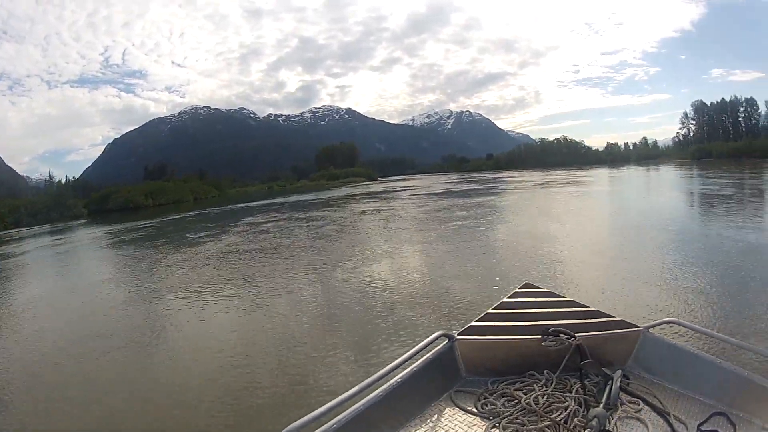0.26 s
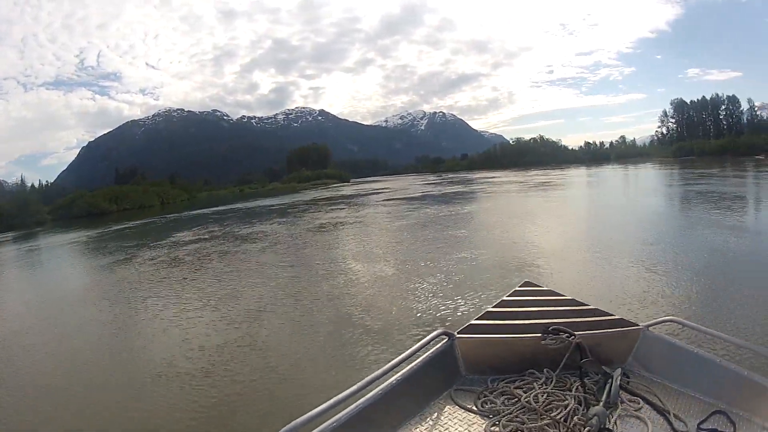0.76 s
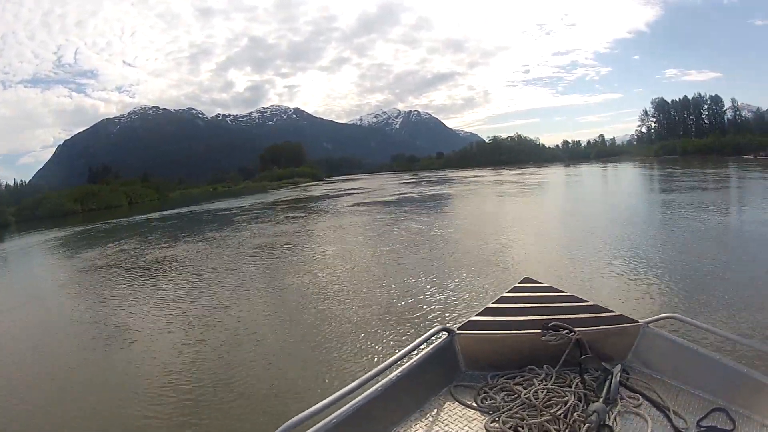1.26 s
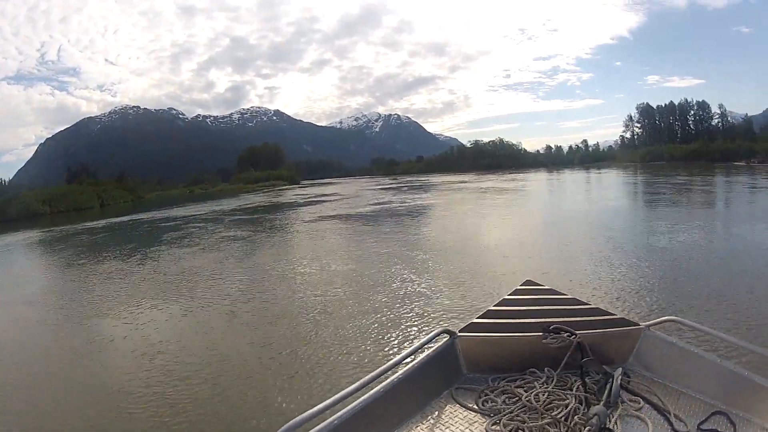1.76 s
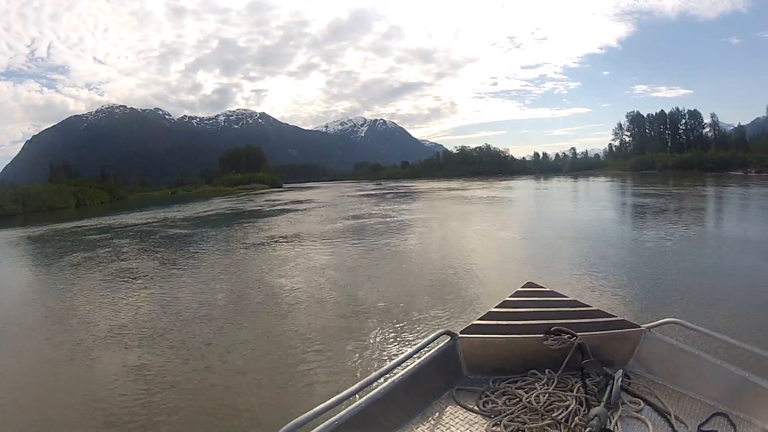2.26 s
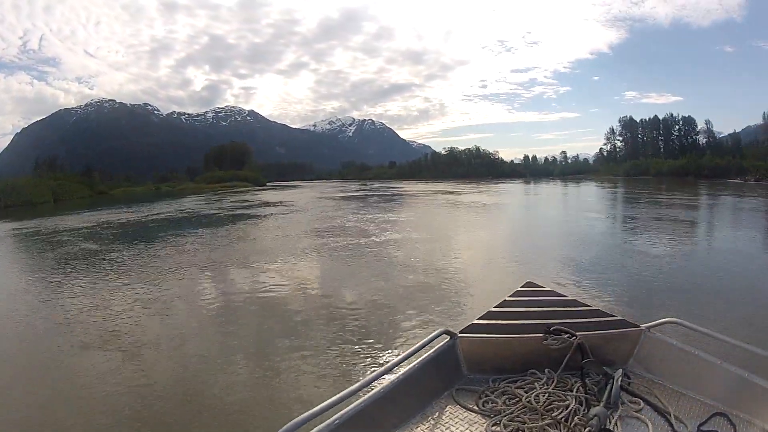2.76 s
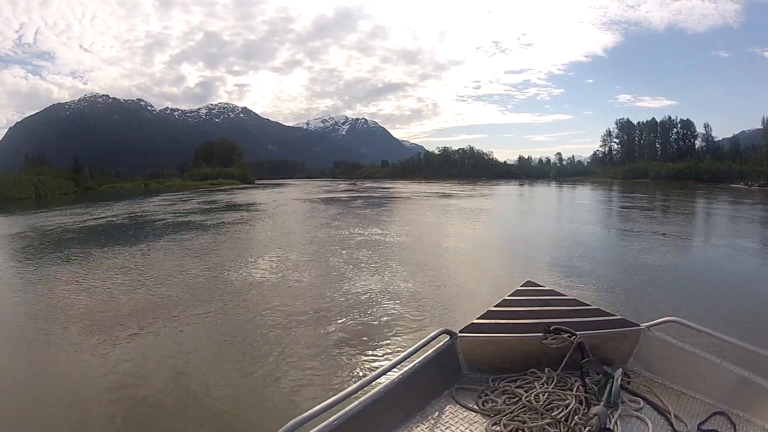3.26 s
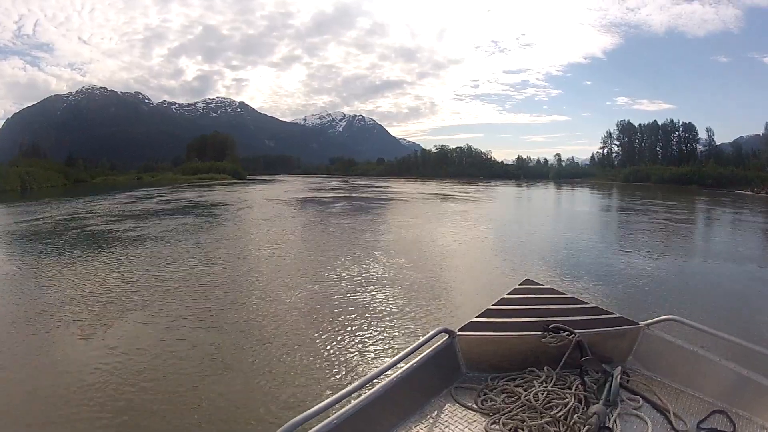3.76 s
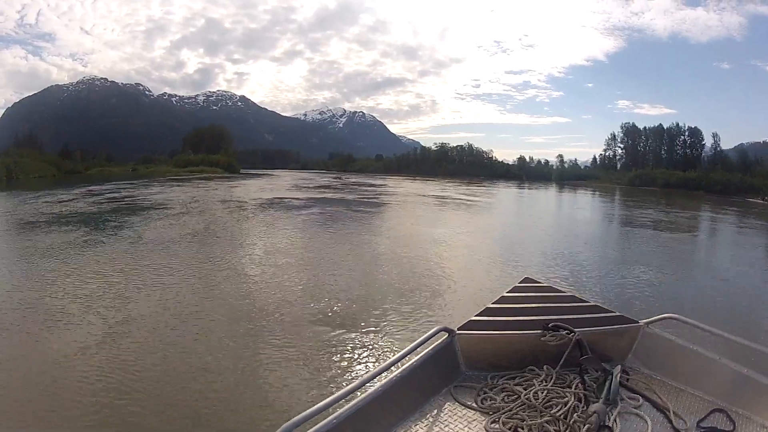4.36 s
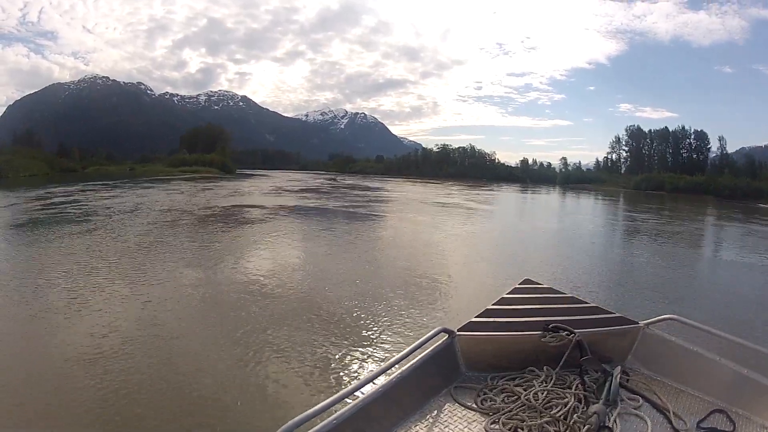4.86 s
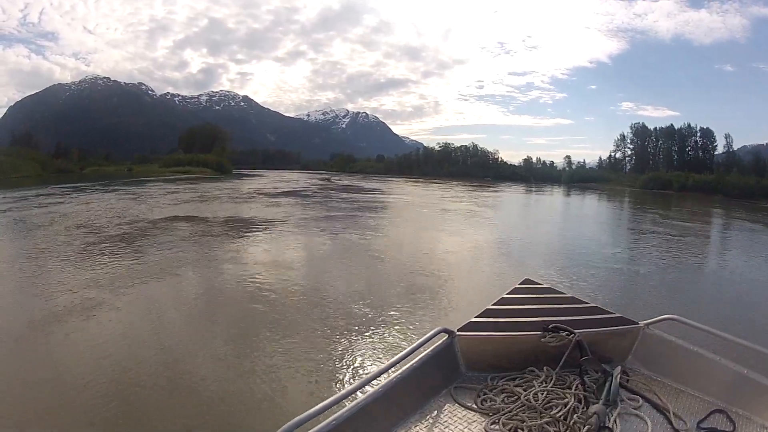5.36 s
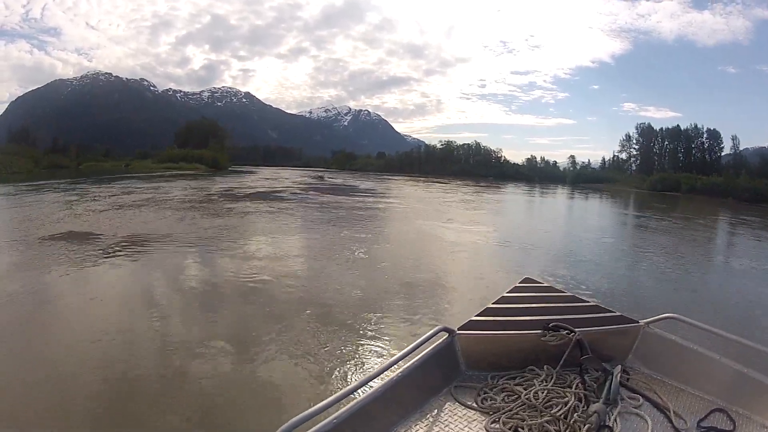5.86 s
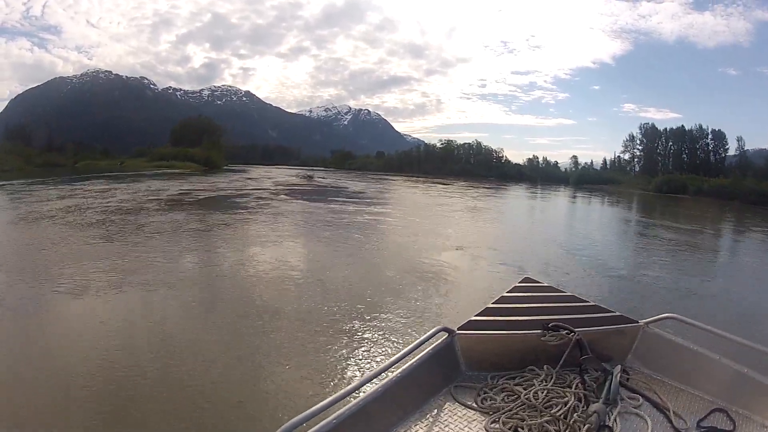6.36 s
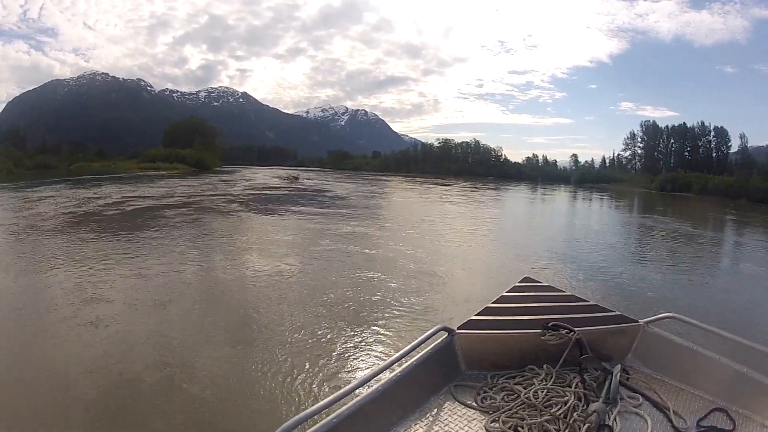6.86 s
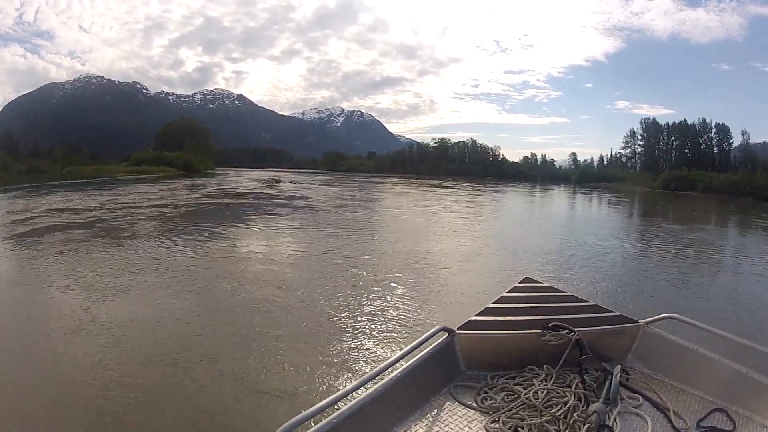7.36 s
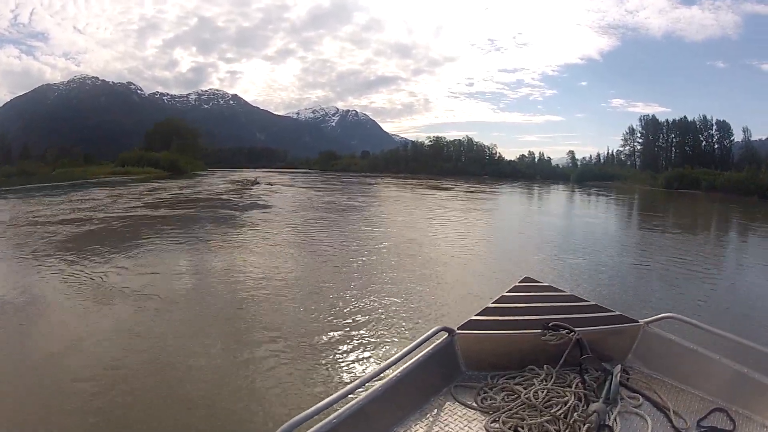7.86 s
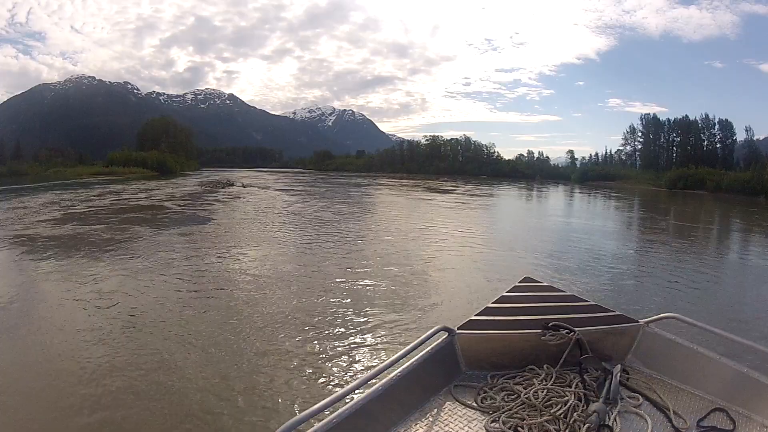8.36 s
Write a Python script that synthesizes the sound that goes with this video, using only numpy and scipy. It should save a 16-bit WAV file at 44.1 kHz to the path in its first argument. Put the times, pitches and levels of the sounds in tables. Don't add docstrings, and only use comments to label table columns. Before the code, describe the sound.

Aboard an open metal boat cruising a wide river, a low, slightly rough engine drone stays at constant speed, its throb swelling and thinning. Bright spray and wash hiss along the hull, fluttering as the bow lifts and lands. Small slaps tick by, a heavy bump lands near 1.8 seconds, and wind rumbles. The close microphone in a small closed case sounds boxy, with gritty treble.

```python
import sys
import numpy as np
from scipy import signal
from scipy.fft import rfft, irfft, next_fast_len
from scipy.io import wavfile
from scipy.ndimage import uniform_filter1d

SR = 44100
rng = np.random.default_rng(int(sys.argv[2]) if len(sys.argv) > 2 else 0)


def generate_wav(sig):
    pcm = np.round(np.clip(np.atleast_2d(sig).T, -1, 1) * 32767).astype(np.int16)
    wavfile.write(sys.argv[1], SR, pcm)


def linear_from_db(decibels):
    return 10 ** (np.asarray(decibels, float) / 20)


N = 380583
TIME = np.arange(N) / SR

# start_s, cycles_per_s
ENGINE_SPEED = [(0.0, 34.876), (0.78, 34.865), (1.56, 34.816), (2.34, 34.852), (3.12, 34.791),
                (3.9, 34.982), (4.68, 34.917), (5.46, 34.996), (6.24, 34.966), (7.02, 34.976), (7.8, 34.93),
                (8.58, 34.972)]
# multiple, level_db
STEADY_MULTIPLES = [(2, -56.5), (5, -30.5), (13, -79), (14, -71), (26, -63), (40, -63)]
WAVER_SHARE = [.25, .95, .2, .12, .14, .15, .1, .12, .3, .2, .25, .25, .5]
# start_s, shaft_throb_db, firing_bark_db
MOUNT_SWAY = [(0.0, -23, -33), (0.25, -24.5, -34), (0.8, -30, -33), (1.0, -38, -32.5), (1.65, -37, -31.5),
              (2.0, -29, -38.5), (2.3, -24, -39.5), (2.65, -29.5, -33), (3.4, -28, -39), (4.1, -26, -34),
              (4.4, -30.5, -34), (4.85, -23.5, -30.5), (5.4, -24, -32), (5.75, -42.5, -36.5),
              (7.15, -33, -38), (7.5, -22.5, -40), (7.9, -35, -33), (8.63, -35.5, -33)]
# multiple, before_db, after_db
HULL_PANELS = [(1, -52, -40), (3, -27.5, -34.5), (6, -36.5, -32.5), (7, -33, -32.5), (9, -48, -53),
               (10, -50, -49), (11, -53.5, -50.5), (12, -54.5, -49.5), (17, -57.5, -60), (18, -56, -60.5)]
# centre_s, multiple, change_db, length_s
PANEL_FLEX = [(0.4, 18, 6, .5), (1.448, 7, -10, 0.36), (1.55, 10, 8, .45), (3.0, 12, -9, 0.69),
              (2.25, 5, 4, .3), (2.5, 10, 9, 0.38), (2.6, 7, -8, 0.23), (3.002, 6, 6, 1.77),
              (2.8, 11, -6.5, 1.6), (3.4, 3, -9.5, .5), (3.497, 10, 11.5, 0.26), (3.7, 5, 2, .7),
              (3.9, 18, -9, 1.2), (4.0, 12, 2, 1), (4.036, 7, 6, 0.32), (4.6, 7, -11, 0.22),
              (4.9, 18, 10, 0.49), (5.0, 7, 4.5, 0.21), (5.25, 1, 7, .25), (5.55, 7, -3.5, .4),
              (6.2, 5, -2.5, .5), (6.6, 6, -9, 0.32), (6.69, 7, 3, 0.45), (7.2, 3, 4, .5),
              (7.2, 12, -3, .4), (8.2, 18, 8, 1.2), (8.2, 17, 9, 1.3), (8.295, 7, 5.5, 0.3),
              (8.4, 6, -10, .6), (0.95, 6, -11, .25)]
# freq_hz, level_db_per_hz
BOOM_SPECTRUM = [(60, -24), (82, -6), (97, 5.5), (116, -9), (150, -9), (200, -10), (236, 1), (262, -8),
                 (300, -16), (420, -23), (700, -36)]
# start_s, spray_db, wash_db
WATER_FLOW = [(0.0, -51, -41.5), (0.25, -52.5, -45.5), (0.6, -47.5, -43), (1.0, -43, -45),
              (1.45, -44, -48.5), (1.56, -41.5, -46), (2.3, -40.5, -45), (2.9, -44, -45.5),
              (4.55, -44, -42), (5.45, -50, -43), (5.7, -41.5, -44.5), (6.3, -40.5, -45.5),
              (7.2, -36.5, -45), (7.66, -45, -45.5), (7.83, -38.5, -45), (8.1, -40, -48.5),
              (8.3, -50.5, -49), (8.63, -42.5, -47)]
# landing_s, lull_db, lull_length_s, surge_db
BOW_BOUNCES = [(0.33, 0.5, .1, 7), (0.91, -4, 0.045, 1), (1.096, -9, 0.1, 10.5), (1.2, -3, 0.043, 2),
               (1.513, -2.5, 0.12, 2), (1.869, -4, 0.079, 1.5), (2.17, -2, 0.074, 5.5),
               (2.802, -3, 0.026, 4), (3.031, -11, 0.047, -0.5), (3.45, -4, 0.13, 5.5),
               (3.69, -5, 0.068, 0), (3.865, -4, .05, 0), (4.394, -7, 0.043, 2), (4.7, -4, 0.06, -1.5),
               (5.218, 4, 0.05, 6), (5.886, -7.5, 0.077, -1.5), (5.97, -2, .04, 2.5), (6.113, -3, 0.071, 4),
               (6.2, -1, 0.024, -2.5), (6.508, -2, 0.13, 3), (6.675, -2, 0.055, 4), (7.007, -4.5, .06, 1.5),
               (7.338, -6, .05, -2), (7.7, -1.5, 0.044, 1), (8.28, -5, 0.055, 3), (8.327, -1, 0.034, 6.5),
               (8.462, -1.5, .06, 7.5)]
# freq_hz, level_db_per_hz
WASH_SPECTRUM = [(380, -23), (500, -11.5), (620, -3), (730, -4), (930, -1.5), (1150, -7), (1600, -5.5),
                 (2100, -4), (2600, -9.5), (3100, -14.5), (3700, -13)]
# freq_hz, level_db_per_hz
SPRAY_SPECTRUM = [(1200, -19), (1700, -10), (2100, -5), (2450, 0), (2750, 0), (3000, -6), (3350, -9.5),
                  (3600, -20.5), (4200, -23.5)]
# freq_hz, level_db_per_hz
MIST_SPECTRUM = [(3000, -40), (3500, -18), (4000, -2.5), (5100, -5), (5600, -11), (5850, -16), (6300, -16)]
# freq_hz, width_hz, peak_db
DRUMMED_PLATES = [(632, 50, 3), (923, 60, 2.5)]
# freq_hz, width_hz, peak_db
CASE_MODES = [(2197, 59, 3), (2614, 130, 0.5), (3217, 124, 9.5), (3780, 230, 5.5), (4460, 200, 0),
              (4640, 180, 2.5)]
# start_s, peak_db
BOW_SLAPS = [(1.098, -28), (1.2096, -30.5), (1.4516, -28.5), (2.173, -43.5), (3.9649, -31), (5.8791, -33),
             (6.2852, -26.5), (6.511, -30), (6.6683, -29), (6.844, -24), (7.275, -29.5), (7.9294, -40)]
# freq_hz, level_db_per_hz
SPLASH_SPECTRUM = [(500, 0), (1200, -13), (2500, 7), (3400, -6.5), (3900, -22.0), (5600, -25)]
# start_s, peak_db, pitch_hz
HULL_BUMPS = [
    (1.762, -8, 108),
    (4.599, -34, 108),
    (6.113, -17, 105),
]
# freq_hz, level_db_per_hz
WIND_SPECTRUM = [(8, -18), (20, -3), (45, -1), (80, 3), (110, -3.5), (250, -34)]
# centre_s, rise_db, length_s
WIND_GUSTS = [
    (1.0, 2, 0.33),
    (1.4, 5, .2),
    (2.05, 4, 0.4),
    (4.45, 5.5, .5),
    (5.3, 8.5, .25),
    (5.7, 10, .35),
    (6.75, 0, .2),
    (7.5, 1, 1),
    (8.3, 1, .2),
]

TRIM_S, TRIM_TAKES_S = 2.92, 0.91
BOOM_DB, WIND_DB = -30.5, -36.5
SURGE_FADES_S, SLAP_DIES_S = 0.047, 0.011
TAKE_HZ, HOLD_STEPS, TOP_HZ = 12000, 4, 15265


def columns(table):
    s, *cols = np.transpose(table)
    return [np.interp(TIME, s, c) for c in cols]


def unit(x):
    return x / np.sqrt(np.mean(np.abs(x) ** 2))


def colour(x, spectrum, modes=()):
    size = next_fast_len(N)
    hz, db = np.transpose(spectrum)
    bins_hz = np.fft.rfftfreq(size, 1 / SR) + 1
    shape_db = np.interp(np.log(bins_hz), np.log(hz), db, -90, -90)
    for mode_hz, width_hz, peak_db in modes:
        shape_db += peak_db / (1 + (2 * (bins_hz - mode_hz) / width_hz) ** 2)
    return unit(irfft(rfft(x, size) * linear_from_db(shape_db), size)[:N])


def walk(rate_hz):
    hold = int(SR / rate_hz)
    steps = np.repeat(rng.standard_normal(N // hold + 1), hold)
    return unit(uniform_filter1d(uniform_filter1d(steps, hold), hold)[:N])


def swell(centre_s, length_s):
    return np.exp(-(2 * (TIME - centre_s) / length_s) ** 2)


def multiple(turns, order, db):
    share = np.clip(WAVER_SHARE[min(order, len(WAVER_SHARE)) - 1], 0, .95)
    waver = (walk(13) + 1j * walk(13)) / np.sqrt(2)
    size = np.sqrt(1 - share ** 2) + share * waver
    lag_cycles = .22 * abs(order - 6) + .08 * order - .23
    return np.sqrt(2) * linear_from_db(db) * np.real(size * np.exp(2j * np.pi * (order * turns - lag_cycles)))


def engine(turns):
    settled = .5 + .5 * np.tanh((TIME - TRIM_S) / TRIM_TAKES_S)
    levels_db = dict(zip((4, 8), columns(MOUNT_SWAY)))
    for order, before_db, after_db in HULL_PANELS:
        levels_db[round(order)] = before_db + (after_db - before_db) * settled
    for order, db in STEADY_MULTIPLES:
        levels_db[round(order)] = db
    for s, order, change_db, length_s in PANEL_FLEX:
        levels_db[round(order)] = levels_db[round(order)] + change_db * swell(s, length_s)
    return sum(multiple(turns, order, db) for order, db in levels_db.items())


def gust_db():
    return sum(db * swell(s, length_s) for s, db, length_s in WIND_GUSTS)


def hull_boom(turns):
    firing = np.diff(np.floor(8 * turns), prepend=0)
    level_db = BOOM_DB + .6 * walk(6) + .3 * gust_db()
    return colour(firing * rng.standard_normal(N), BOOM_SPECTRUM) * linear_from_db(level_db)


def drops(scatter_db, per_s):
    hit = rng.random(N) < per_s / SR
    size = linear_from_db(scatter_db * np.minimum(rng.exponential(size=N), 2))
    return rng.standard_normal(N) * (1 + 2.1 * hit * size)


def bounce_db():
    change_db = np.zeros(N)
    for s, lull_db, length_s, surge_db in BOW_BOUNCES:
        change_db += lull_db * np.sin(np.pi * np.clip((s - TIME) / length_s, 0, 1) ** .7)
        change_db += surge_db * (TIME > s) * np.exp(-np.abs(TIME - s) / SURGE_FADES_S)
    return uniform_filter1d(change_db, SR // 250)


def dip_before_slaps():
    return linear_from_db(sum(-7 * (TIME < s) * np.exp(-np.abs(TIME - s) / 0.003) for s, _ in BOW_SLAPS))


def water(turns):
    spray_db, wash_db = columns(WATER_FLOW)
    lull_db = bounce_db()
    mist_db = -55.5 + 1.28 * (wash_db - wash_db.mean()) + 0.13 * (spray_db - spray_db.mean())
    flicker_db = 0.21 * walk(30) + 1.5 * walk(90)
    throb_db = 0.81 * np.cos(2 * np.pi * (turns - .9))
    wash_db = wash_db + 2.5 + 0.47 * lull_db + 0.28 * flicker_db + 0.64 * walk(12) + throb_db
    spray_db = spray_db + lull_db + 0.47 * walk(40) + 0.83 * flicker_db + .5 * walk(24)
    mist_db = mist_db + 0.4 * lull_db + 0.57 * flicker_db + 0.82 * walk(11)
    wash = colour(drops(2.1, 500), WASH_SPECTRUM, [*DRUMMED_PLATES, *CASE_MODES]) * linear_from_db(wash_db)
    spray = colour(drops(2.9, 800), SPRAY_SPECTRUM, CASE_MODES) * linear_from_db(spray_db)
    mist = colour(drops(4.5, 600), MIST_SPECTRUM, CASE_MODES) * linear_from_db(mist_db)
    return dip_before_slaps() * (wash + spray + mist)


def slaps():
    burst = np.zeros(N)
    for s, db in BOW_SLAPS:
        burst += linear_from_db(db - 7.5) * (TIME > s) * np.exp(-np.abs(TIME - s) / SLAP_DIES_S)
    return burst * colour(rng.standard_normal(N), SPLASH_SPECTRUM, CASE_MODES)


def bumps():
    bump = np.zeros(N)
    for s, db, hz in HULL_BUMPS:
        envelope = linear_from_db(db - 4.5) * np.exp(-((TIME - s - .011) / 0.0073) ** 2)
        bump -= envelope * np.cos(2 * np.pi * hz * (TIME - s - .009))
    return bump


def wind():
    level_db = WIND_DB - 2 + gust_db() + 1.2 * walk(7)
    return colour(rng.standard_normal(N), WIND_SPECTRUM) * linear_from_db(level_db)


def scene():
    turns = np.cumsum(columns(ENGINE_SPEED)[0]) / SR
    return (engine(turns) + hull_boom(turns) + water(turns) + slaps() + bumps() + wind())[None]


def top_cut(x):
    return signal.sosfilt(signal.butter(12, 16500, fs=SR, output="sos"), x)


def record(dry):
    taken = signal.resample_poly(dry, TAKE_HZ // 300, SR // 300, axis=1)
    held = np.repeat(taken, HOLD_STEPS, axis=1)[:, HOLD_STEPS // 2:]
    smooth = signal.resample_poly(held, SR // 300, HOLD_STEPS * TAKE_HZ // 300, axis=1, window=("kaiser", 8))
    low_pass = signal.ellip(10, .1, 50, TOP_HZ, fs=SR, output="sos")
    cut = signal.sosfiltfilt(low_pass, smooth)
    mix = np.pad(cut, ((0, 0), (0, 16)))[:, :N]
    return top_cut(mix)


dry = scene()
out = record(dry)
generate_wav(out)
```